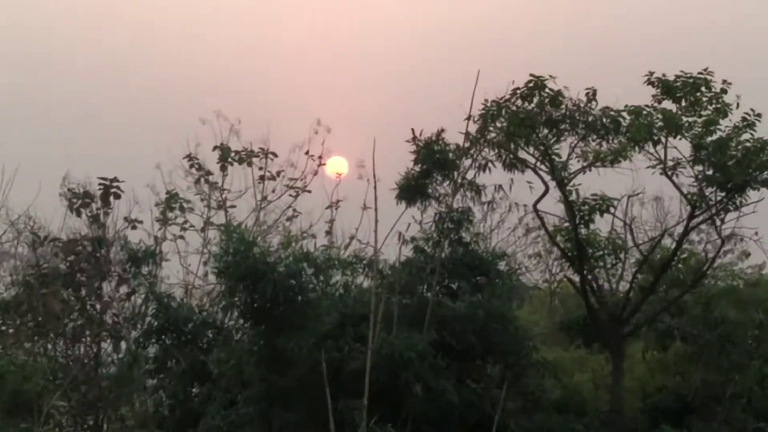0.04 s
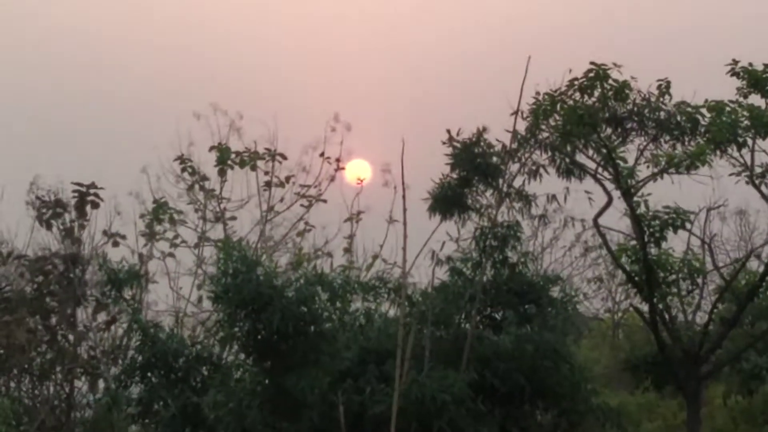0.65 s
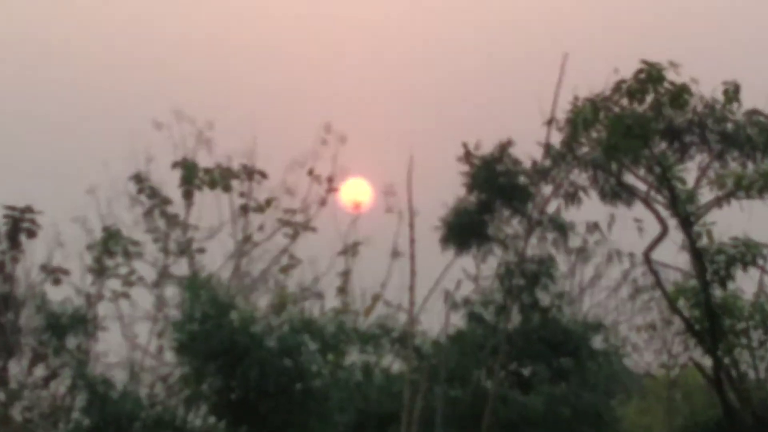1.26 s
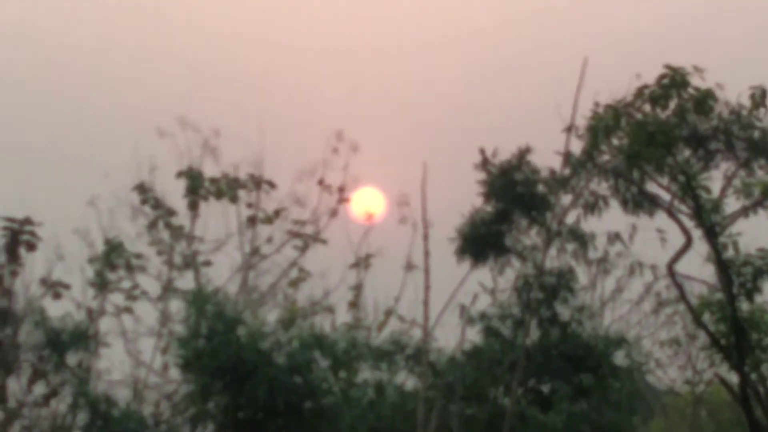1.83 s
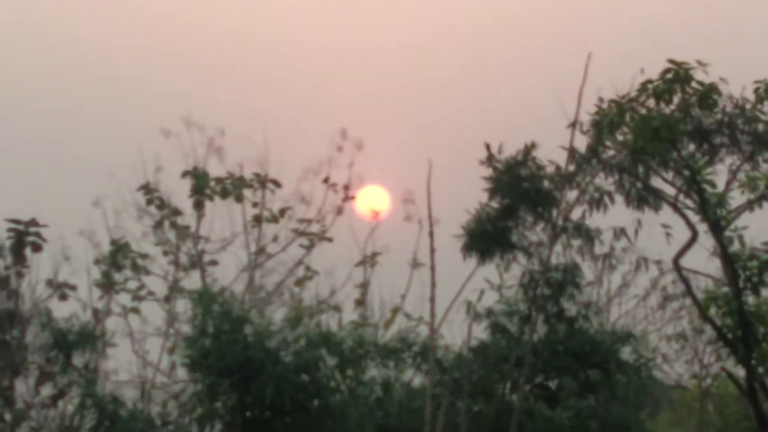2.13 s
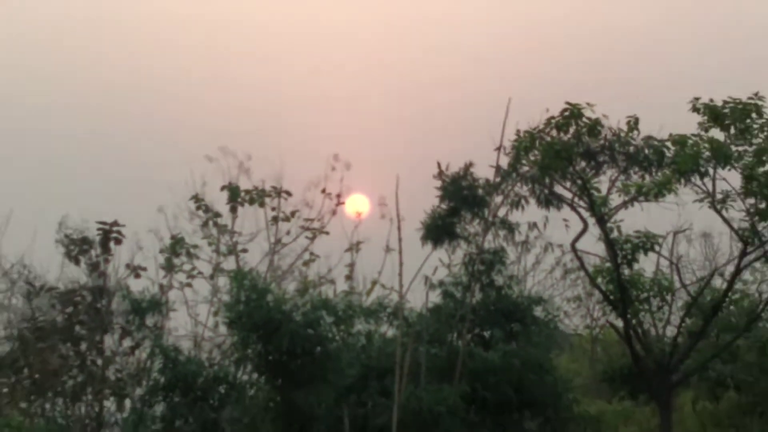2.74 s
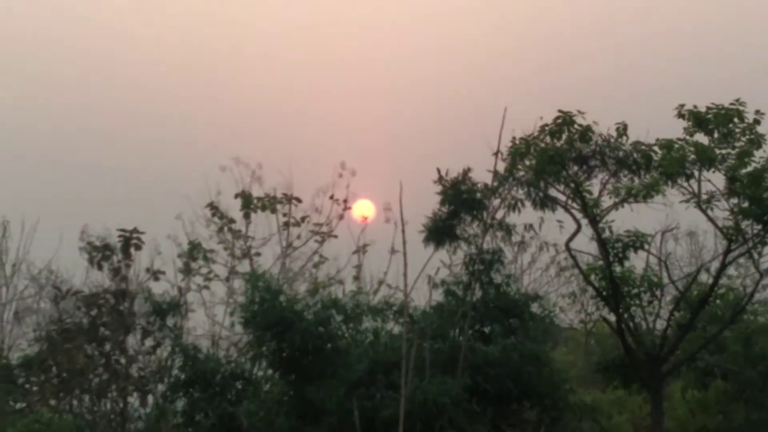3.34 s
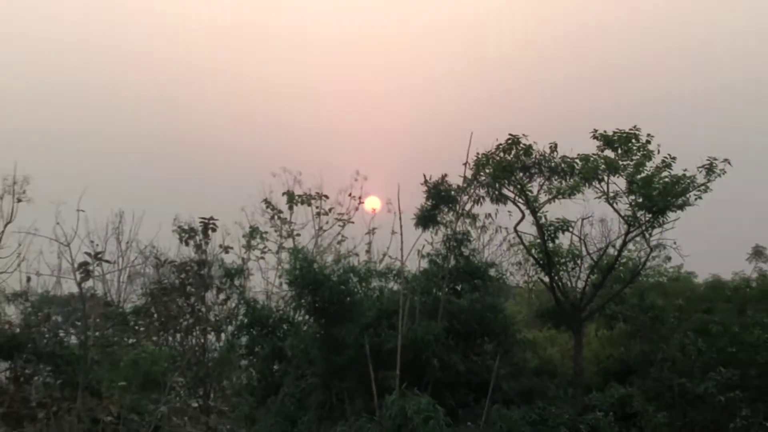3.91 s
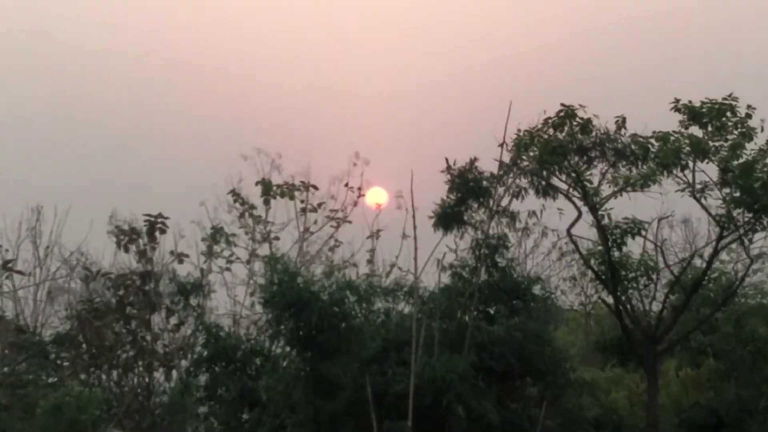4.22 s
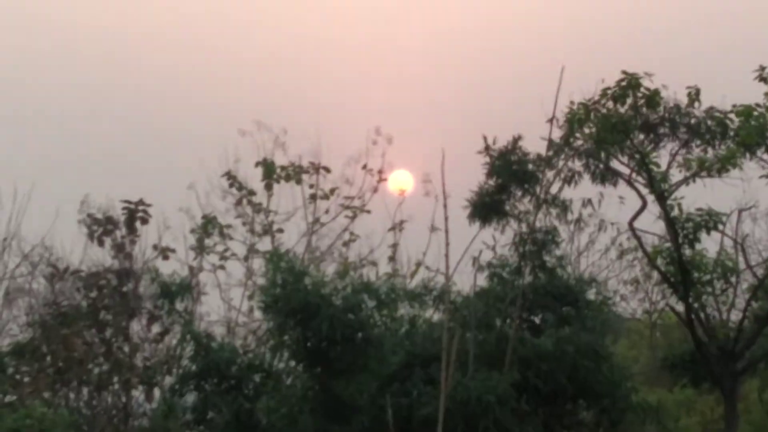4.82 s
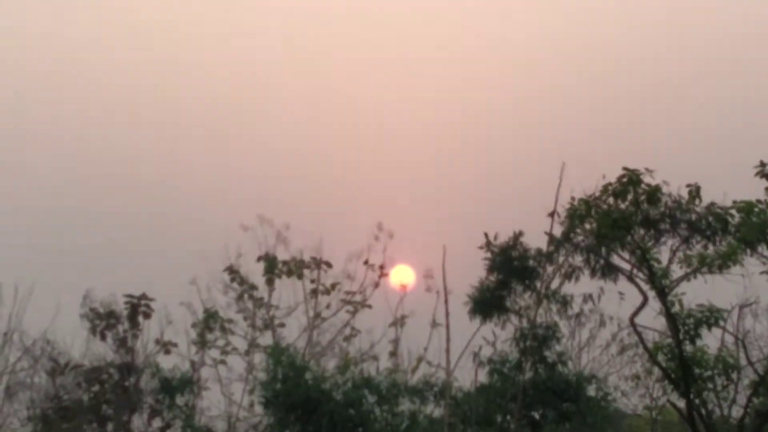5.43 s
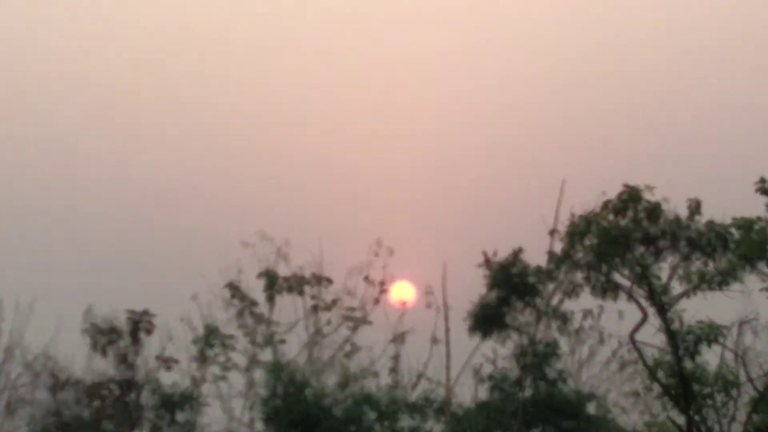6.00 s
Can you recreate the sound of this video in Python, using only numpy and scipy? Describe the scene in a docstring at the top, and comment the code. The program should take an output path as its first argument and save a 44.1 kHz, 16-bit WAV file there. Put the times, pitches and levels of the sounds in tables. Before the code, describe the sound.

Light gusts buffet a hand-held stereo microphone outdoors, making an uneven low rumble with occasional handling clicks and thumps on the left. Birds chirp and twitter briskly at first, give way to soft distant whistles, then return with chirrups and a clear gliding song on the right. Their calls echo slightly off the trees, and the bumps cluster near the end.

```python
"""Among trees at dawn, around a hand-held camera. Birds sing gliding syrinx tones: a hoarse call, a
chirrup, distant whistlers, a thin squealer, a rising lisp and, late, a near songster, over a far chorus.
The treeline returns an echo and a diffuse tail. Light wind buffets the two microphone ports separately;
small handling bumps pop on the left one."""
import sys
import numpy as np
from scipy import signal
from scipy.fft import rfft, irfft, next_fast_len
from scipy.io import wavfile
from scipy.ndimage import uniform_filter1d, map_coordinates

SR = 44100
rng = np.random.default_rng(int(sys.argv[2]) if len(sys.argv) > 2 else 0)


def put_to_file(sound):
    """Save the sound as 16-bit audio at rate SR, in the file named by the first command-line argument."""
    columns = np.atleast_2d(sound).T  # one column per channel
    safe = np.clip(columns, -1, 1)
    whole_steps = np.round(safe * 32767)
    wavfile.write(sys.argv[1], SR, whole_steps.astype(np.int16))


N = 267246


def amp(db):
    """Decibels to gain."""
    return 10 ** (np.asarray(db) / 20)


def unit(x):
    """Scale to rms 1."""
    return x / np.sqrt(np.mean(x ** 2) + 1e-20)


def along(points, hz):
    """Interpolate (Hz, value) points on a log axis."""
    f, v = np.transpose(points)
    return np.interp(np.log(hz + 1), np.log(f + 1), v)


def curve(points):
    """Interpolate (s, value) points at every sample."""
    return np.interp(np.arange(N) / SR, *np.transpose(points))


def wobble(rate_hz, size=N):
    """Smooth random curve, rate_hz knots a second."""
    knots = rng.standard_normal(int(size * rate_hz / SR) + 4)
    return map_coordinates(knots, [np.arange(size) * rate_hz / SR])


def filtered(x, response):
    """Apply a frequency response."""
    m = next_fast_len(N + SR // 2)
    return irfft(rfft(x, m) * response(np.fft.rfftfreq(m, 1 / SR)), m)[..., :N]


def noise(spectrum):
    """Noise of rms 1, coloured by (Hz, dB) points."""
    return unit(filtered(rng.standard_normal(N), lambda hz: amp(along(spectrum, hz))))


def add(track, s, sound):
    """Mix a sound into a track from time s."""
    start = max(0, round(s * SR))
    part = track[..., start:start + sound.shape[-1]]
    part += sound[..., :part.shape[-1]]


def panned(x, pan_db):
    """Equal-power pan; pan_db is left minus right."""
    return unit(amp([[pan_db / 2], [-pan_db / 2]])) * x


def lagged(pair, lag_s):
    """Sound from the side reaches the right port lag_s after the left."""
    return filtered(pair, lambda hz: np.exp(1j * np.pi * hz * lag_s * np.array([[1], [-1]])))


def note(rows, rough, overtone_db, shimmer_db=1.5, fade_s=0.0027):
    """Syrinx tone through (s, Hz, dB) points, with weak overtones; rough is fractional pitch jitter."""
    s, hz, db = np.transpose(rows)
    t = np.arange(s[0], max(s[-1], s[0] + .01), 1 / SR)
    pitch_hz = uniform_filter1d(np.interp(t, s, hz), size=300)
    pitch_hz *= 1 + rough * wobble(603.5, size=len(t))
    phase = 2 * np.pi * np.cumsum(pitch_hz) / SR
    overtones = sum(np.sin(k * phase) * (k * pitch_hz < SR / 2) for k in (2, 3))
    gate = np.clip(np.minimum(t - t[0], t[-1] - t) / fade_s, 0, 1)
    level_db = np.interp(t, s, db) + shimmer_db * wobble(56.0, size=len(t))
    return gate * amp(level_db) * (np.sin(phase) + amp(overtone_db) * overtones)


def bend(u, first, middle, last):
    """Parabola through three values at u = 0, 0.5, 1."""
    return np.polyval(np.polyfit([0, .5, 1], [first, middle, last], 2), u)


def arc(s, length_s, first_hz, middle_hz, last_hz, db):
    """(s, Hz, dB) points of a slurred note that bends, swells and eases."""
    # Each row: share of length, gain in dB.
    swell = [(0, -13.5), (.3, -1), (.55, 1), (1, -4)]
    u = np.linspace(0, 1, num=41)
    pitch_hz = bend(u, first_hz, middle_hz, last_hz)
    return np.transpose([s + length_s * u, pitch_hz, db + np.interp(u, *np.transpose(swell))])


def phrase(notes, rough, overtone_db, shimmer_db=1.5):
    """One bird's notes on one track."""
    out = np.zeros(N)
    for rows in notes:
        add(out, rows[0][0], note(rows, rough, overtone_db, shimmer_db))
    return out


def repeated(calls, shape, rough, overtone_db):
    """One call shape sung at several pitches and levels."""
    out = np.zeros((2, N))
    for s, top_hz, db, pan_db in calls:
        rows = [(t, share * top_hz, db + swell_db) for t, share, swell_db in shape]
        add(out, s, panned(note(rows, rough, overtone_db), pan_db))
    return out


def stretched(calls, shape, rough):
    """One call shape at several lengths and pitches, flickering on its way through the trees."""
    out = np.zeros((2, N))
    for s, length_s, top_hz, db, pan_db in calls:
        rows = [(u * length_s, share * top_hz, db + swell_db) for u, share, swell_db in shape]
        add(out, s, panned(note(rows, rough, overtone_db=-39, shimmer_db=3.5), pan_db))
    return out


def grove(x, echo_db, tail_db, delay_s=0.069, spread_s=0.011):
    """Return from the trees: a treeline echo, scatter just behind it, a diffuse tail."""
    # Each row: frequency in Hz, T60 in seconds.
    decay = [(1000, 0.36), (3500, 0.64), (6000, 0.52), (12000, 0.092)]
    hz, frame_s, spectra = signal.stft(rng.standard_normal((2, SR)), SR, nperseg=256)
    tail = signal.istft(spectra * amp(-60 * frame_s / along(decay, hz)[:, None]), SR, nperseg=256)[1]
    t = np.arange(tail.shape[1]) / SR
    scatter = rng.standard_normal(tail.shape) * (t > delay_s) * np.exp(-np.abs(t - delay_s) / spread_s)
    reflection = np.arange(len(t)) == round(delay_s * SR)
    echo = unit(unit(scatter) + unit(reflection))
    response = amp(tail_db) * unit(tail) + amp(echo_db) * echo
    return signal.fftconvolve(np.atleast_2d(x), response / np.sqrt(len(t)), axes=1)[:, :N]


def still_air():
    """Quiet outdoor floor, independent in each port."""
    # Each row: frequency in Hz, relative density in dB.
    colour = [(88, -44), (150, -11), (201, -13), (302, -10.5), (366, -13.5), (500, -13), (695, -19.5),
              (3690, -36), (8170, -35), (9000, -39), (12300, -42), (13800, -43), (15500, -60)]
    return amp(-61) * np.array([noise(colour), noise(colour)])


def far_voices(colour, patchy_db):
    """Many far birds, blurred into narrow flickering patches of pitch."""
    spectra = signal.stft([noise(colour), noise(colour)], nperseg=1024)[2]
    patches = uniform_filter1d(rng.standard_normal(spectra.shape[1:]), size=3, axis=0)
    patches = unit(uniform_filter1d(patches, size=9, axis=1))
    return unit(signal.istft(spectra * amp(patchy_db * patches), nperseg=1024)[1][:, :N])


def dawn_chorus():
    """Far high and low voices, swelling separately."""
    # Each row: frequency in Hz, relative density in dB.
    high_colour = [(1500, -11), (2000, -2), (2300, -0.5), (2700, -3.5), (3300, -0.5), (3900, -4),
                   (4600, -11), (5400, -13), (7000, -24)]
    low_colour = [(800, -27), (1100, -5), (1350, 1.5), (1700, 1.5), (1950, -12.5), (2400, -38.5)]
    # Each row: time in seconds, relative level in dB.
    high_levels = [(0, -59.5), (.3, -61.5), (1.2, -64.5), (1.8, -69), (3.4, -63.5), (4.2, -66),
                   (5.5, -62.5), (6.06, -65)]
    low_levels = [(0, -67), (1, -76), (2, -79), (3, -73), (4.3, -62), (5.1, -62), (6.06, -65.5)]
    high = amp(curve(high_levels) + .5) * panned(far_voices(high_colour, patchy_db=6.0), pan_db=-6)
    low = amp(curve(low_levels)) * panned(far_voices(low_colour, patchy_db=4.2), pan_db=-2)
    return high + low


def gusts(side, calm_db, calm_eddy_db, rise_db_per_s, fall_db_per_s, eddy_swing):
    """Rumble and eddy levels at one port: gusts rise, hold and fall, eddies more steeply."""
    # Each row: port, start of hold in seconds, hold in seconds, relative rumble in dB, eddy offset in dB.
    events = [("left", 0, 0.0084, -43, 3.6), ("left", 0.698, 0.056, -39, -1.2),
              ("left", 0.893, 0.22, -45, -3.5), ("left", 2.08, 0.051, -37, -5.5),
              ("left", 2.27, .13, -36, -13), ("left", 3.318, 0.079, -32.5, -10.5),
              ("left", 3.47, 0.58, -38, -30.5), ("left", 4.02, 0.24, -37, -6),
              ("left", 4.3, 0.077, -31, -8), ("right", 0.907, 0.071, -39.5, -24),
              ("right", 1.22, 0.0093, -30, -17.5), ("right", 1.347, .13, -30.5, -13.5),
              ("right", 1.526, 0.04, -30, -4.5), ("right", 1.66, .16, -39.5, -16),
              ("right", 1.846, .06, -28, -11), ("right", 2.087, .11, -29, -20),
              ("right", 2.92, 0.013, -42, -18), ("right", 3.32, .04, -39, -19),
              ("right", 3.58, .2, -32, -18), ("right", 3.84, .15, -29.5, -10),
              ("right", 4.18, .1, -32.5, -1), ("right", 4.37, 0.023, -29.5, -20),
              ("right", 4.57, 0.11, -42, -15), ("right", 4.87, 0.053, -31, -20),
              ("right", 5.02, 0.045, -33, -13.5), ("right", 5.32, .07, -35.5, -13.5),
              ("right", 5.5, 0.052, -31.5, -14), ("right", 5.86, 0.16, -31.5, -18.5)]
    t = np.arange(N) / SR
    rumble_db, eddy_db = np.full(N, float(calm_db)), np.full(N, float(calm_eddy_db))
    for where, s, hold_s, db, offset_db in events:
        if where == side:
            drop_db = rise_db_per_s * np.maximum(s - t, 0) + fall_db_per_s * np.maximum(t - s - hold_s, 0)
            rumble_db = np.maximum(rumble_db, db - drop_db)
            eddy_db = np.maximum(eddy_db, db + offset_db - eddy_swing * drop_db)
    return rumble_db, eddy_db


def port_wind(levels, eddy_colour, rumble_gain_db, lump_db, eddy_gain_db=2.5):
    """Wind at one port: low rumble and smaller eddies, both in lumps."""
    # Each row: frequency in Hz, relative density in dB.
    rumble_colour = [(15, -46.5), (25, -23), (40, -7), (62, 4), (90, -1.5), (150, -7.5), (250, -31),
                     (500, -50), (1500, -97.5)]
    rumble_db, eddy_db = levels
    lumps = wobble(35)
    rumble = unit(noise(rumble_colour) * amp(2.3 * lumps))
    eddies = unit(noise(eddy_colour) * amp(lump_db * (lumps + wobble(130))))
    return amp(rumble_db + rumble_gain_db) * rumble + amp(eddy_db + eddy_gain_db) * eddies


def wind():
    """Gusts catch each port separately: a rush on the left, a duller flutter on the right."""
    # Eddy spectra. Each row: frequency in Hz, relative density in dB.
    rush = [(50, -16), (130, -3), (250, 2.5), (400, -2.5), (700, -9), (1200, -14.5), (2000, -27),
            (4000, -30.5), (7000, -41), (14000, -66)]
    flutter = [(60, -22), (140, 9), (220, 5.5), (400, -9), (700, -24.5), (1200, -43), (3000, -78)]
    # Each port: relative calm rumble and eddies in dB, rise and fall in dB/s, eddy-to-rumble slope ratio.
    left_port = (-50, -68, 98, 72.5, 1.5)
    right_port = (-49.5, -66, 246, 164, 1.6)
    left = port_wind(gusts("left", *left_port), rush, rumble_gain_db=0.5, lump_db=2.0)
    right = port_wind(gusts("right", *right_port), flutter, rumble_gain_db=1.5, lump_db=2.5)
    return np.array([left, right])


def hoarse_call():
    """A burry call from the left, roughened by pitch jitter."""
    # Each row: time in seconds, pitch in Hz, relative level in dB.
    contour = [(0, 3157, -48), (.025, 3650, -55), (.04, 3353, -49), (.07, 3595, -48), (.085, 3285, -46),
               (.125, 3085, -55)]
    voice = phrase([contour], rough=0.021, overtone_db=-32.5)
    return panned(voice, pan_db=12) + panned(grove(voice, echo_db=-5.5, tail_db=-1), pan_db=5)


def chirrup():
    """A repeated call: flick up, held tone, drop."""
    # Each row: start in seconds, held pitch in Hz, relative level in dB, pan in dB.
    calls = [(0.121, 2740, -36, 6), (0.388, 2807, -39, 0.5), (0.711, 2835, -41, -2.5),
             (4.113, 2764, -45.5, -25), (4.355, 2790, -47, -19), (4.852, 2830, -46.5, -12),
             (5.188, 2870, -47.5, -13)]
    # Each row: offset in seconds, share of held pitch, gain in dB.
    shape = [(0, .71, -10), (.015, 0.84, 4.5), (.027, 0.89, -11), (.042, 1, -8), (.072, 1, -11.5),
             (.088, .88, -8.5), (.103, 0.68, -13)]
    voice = lagged(repeated(calls, shape, rough=.008, overtone_db=-33), lag_s=.00053)
    return amp(-3.5) * (voice + grove(voice, echo_db=-21, tail_db=-10.5))


def whistlers(ripple_hz=27, ripple_db=3.0, fade_db=11, midway_share=.75):
    """Distant arched hoots, scooped chirps and slurs; paths through the trees ripple the slurs."""
    # Each row: start in seconds, length in seconds, top pitch in Hz, relative level in dB, pan in dB.
    arches = [(2.1, .14, 1610, -60.5, -5), (2.675, 0.097, 1570, -56, -3), (3.002, .1, 1683, -56, -2.5),
              (3.685, .085, 1263, -65, 6), (3.92, .12, 1423, -57.5, 4), (4.16, .16, 1530, -51, 0),
              (4.42, .17, 1593, -53.5, -5), (4.7, 0.19, 1643, -54.5, -2), (5.95, 0.066, 2460, -57.5, -17)]
    scoops = [(1.397, .073, 5270, -62, 4), (1.498, .07, 5240, -64, 3)]
    # Each row: share of length, share of top pitch, gain in dB.
    arch_shape = [(0, .91, -8), (.2, .91, -3.5), (0.449, .99, -0.5), (.55, 1, 1.5), (.7, .97, -0.5),
                  (1, .82, -5)]
    scoop_shape = [(0, .9, -5), (.25, .81, -2), (.5, .8, -1), (.75, .87, 1), (1, 1, -5)]
    # Each row: start in seconds, length in seconds, first and last pitch in Hz, relative level in dB.
    slurs = [(.15, .34, 797, 790, -67), (0.851, 0.072, 3650, 3490, -65.5),
             (2.202, 0.082, 2144, 1870, -64.5), (2.363, 0.16, 2105, 2033, -66),
             (2.705, 0.12, 1990, 1883, -61), (2.838, .209, 1775, 1723, -57.5),
             (3.1, .24, 2208, 2163, -53.5), (3.281, .08, 2150, 1550, -56), (3.459, .08, 1700, 1750, -63.5),
             (3.883, .04, 2200, 2287, -55.5), (3.929, 0.04, 2335, 2286, -53)]
    out = stretched(arches, arch_shape, rough=.007) + stretched(scoops, scoop_shape, rough=0.013)
    u = np.linspace(0, 1, num=41)
    for s, length_s, first_hz, last_hz, db in slurs:
        pitch_hz = first_hz + (last_hz - first_hz) * bend(u, 0, midway_share, 1)
        level_db = db + 0.5 - fade_db * np.abs(2 * u - 1) ** 3
        level_db += ripple_db * np.sin(2 * np.pi * ripple_hz * length_s * u)
        whistle = note(np.transpose([length_s * u, pitch_hz, level_db]), rough=0.0044, overtone_db=-40)
        add(out, s, panned(whistle, pan_db=-11))
    return out + grove(out, echo_db=-17.5, tail_db=-8.5)


def squealer():
    """A thin squeal climbs, warbles and runs into a scratchy twitter, blurred by leaves."""
    # Each row: time in seconds, pitch in Hz, relative level in dB.
    contour = [(0.228, 5800, -65), (0.28, 6180, -54.5), (0.304, 6593, -48), (0.314, 4920, -48.5),
               (0.324, 6060, -54), (0.348, 6570, -51.5), (0.366, 4855, -48)]
    # Each row: start and length in seconds, first, middle and last pitch in Hz, relative level in dB.
    notes = [(.41, 0.059, 5600, 5250, 3200, -46.5), (0.47, 0.039, 4000, 5304, 4110, -42),
             (.53, .036, 5100, 5320, 5100, -50), (0.578, .035, 6500, 5120, 4000, -46),
             (.628, .038, 6300, 5150, 4260, -52.5)]
    squeal = phrase([contour], rough=.009, overtone_db=-18)
    twitter = phrase([arc(*row) for row in notes], rough=.016, overtone_db=-28)
    voice = amp(1.5) * squeal + twitter
    trees = grove(voice, echo_db=-7.5, tail_db=-4.5, delay_s=.047)
    return amp(-3.5) * (panned(voice, pan_db=-23) + trees)


def handling_bumps(thump_hz=55.2, thump_life_s=0.013, rub_rise_s=0.01, rub_fall_s=0.0031):
    """Pressure steps from the hand: a click, then the microphone swings back and rings low."""
    # Each row: start in seconds, relative click in dB, click life in seconds, relative thump in dB.
    pops = [(0.4862, -19, .0014, -15), (.5893, -12.5, 0.0024, -16.5), (1.4241, -23.5, .0015, -28.5),
            (1.8585, -12, 0.0026, -18), (2.7932, -15, 0.00034, -23), (2.815, -18.5, 0.0033, -24),
            (3.1203, -18, 0.0024, -17), (3.149, -14, 0.0027, -7.5), (5.1795, -12, .0009, -17),
            (5.3407, -12, 0.00039, -19), (5.5038, -12, 0.00044, -19), (5.6277, -18, .0005, -25.5)]
    # Hand slips, a rub ending in a click. Each row: click time in seconds, relative level in dB.
    scuffs = [(2.7933, -19.5), (4.3241, -22.5), (5.238, -17), (5.398, -12.5), (5.5826, -10.5),
              (5.6827, -13)]
    scuff_life_s, scuff_thump_db, rub_db = 0.00078, -15.5, -20
    out, t = np.zeros(N), np.arange(SR // 6) / SR
    scuff_pops = [(s, db, scuff_life_s, db + scuff_thump_db) for s, db in scuffs]
    for s, click_db, click_life_s, thump_db in pops + scuff_pops:
        click = amp(click_db + 3) * np.exp(-t / click_life_s)
        thump = amp(thump_db + 6.5) * np.sin(2 * np.pi * thump_hz * t) * np.exp(-t / thump_life_s)
        add(out, s, click - thump)
    rub_band = signal.butter(1, [250, 1300], "bandpass", fs=SR)
    rub_envelope = np.r_[np.exp(-t[::-1] / rub_rise_s), np.exp(-t / rub_fall_s)]
    for s, db in scuffs:
        grit = unit(signal.lfilter(*rub_band, rng.standard_normal(2 * len(t))))
        add(out, s - len(t) / SR, amp(db + rub_db) * grit * rub_envelope)
    # The heaviest bump rocks the whole body for a few cycles.
    cycles = 58 * t + 0.22 * (1 - np.exp(-t / 0.0021))
    add(out, 3.1575, amp(-5.0) * np.sin(2 * np.pi * cycles) * np.exp(-(t / 0.025) ** 2))
    return signal.lfilter(*signal.butter(2, 2000, "lowpass", fs=SR), out)


def lisp():
    """A high rising call, repeated on the right."""
    # Each row: start in seconds, top pitch in Hz, relative level in dB, pan in dB.
    calls = [(0.745, 5130, -54.5, -10), (1.82, 5310, -50.5, -9), (3.108, 5240, -53.5, -15),
             (4.072, 5186, -55.5, -25), (5.232, 5240, -56, -16)]
    # Each row: offset in seconds, share of top pitch, gain in dB.
    shape = [(0, .68, -9.5), (.017, .78, -9), (.05, .92, -1.5), (0.069, 0.97, -0.5), (.08, 1, 3.5),
             (.095, 0.97, -3)]
    voice = repeated(calls, shape, rough=.005, overtone_db=-32)
    return voice + grove(voice, echo_db=-26.5, tail_db=-15)


def eddy_slaps(side, width_cycles=0.28):
    """A single eddy passing a port pushes once and pulls once."""
    # Each row: port, centre in seconds, relative level in dB, nominal frequency in Hz.
    slaps = [("right", 1.378, -22.5, 170), ("right", 1.465, -24, 184), ("right", 1.537, -16, 195),
             ("right", 1.547, -16.5, 170), ("right", 1.572, -18, 250), ("right", 1.889, -17, 95),
             ("right", 1.988, -11, 108), ("left", 3.893, -14, 60), ("right", 4.248, -20, 120),
             ("right", 5.532, -22.5, 95)]
    out, t = np.zeros(N), np.arange(N) / SR
    for where, s, db, hz in slaps:
        if where == side:
            u = (t - s) * hz / width_cycles
            out -= amp(db + 8) * u / (1 + u * u) ** 2
    return out


def songster():
    """Clear slurred whistles from a near tree on the right."""
    # Each row: start and length in seconds, first, middle and last pitch in Hz, relative level in dB.
    notes = [(4.6, 0.082, 4190, 3890, 3100, -47.5), (4.847, 0.07, 3840, 3420, 3190, -43),
             (4.903, 0.092, 3290, 2860, 2540, -51), (5.103, .078, 4070, 3810, 3120, -44),
             (5.101, .014, 4900, 4770, 4600, -56), (5.165, 0.017, 3950, 4000, 3870, -51),
             (5.461, 0.0175, 3600, 3920, 4060, -50.5), (5.225, .058, 2900, 3036, 3170, -42.5),
             (5.335, .138, 3900, 3480, 3750, -43.5), (5.553, .095, 2800, 3143, 3765, -45),
             (5.663, 0.083, 3580, 3840, 3910, -51.5), (5.716, .06, 6560, 3890, 2990, -45),
             (5.77, 0.027, 5200, 4480, 3850, -51.5)]
    voice = phrase([arc(*row) for row in notes], rough=.0055, overtone_db=-31, shimmer_db=2.2)
    trees = grove(voice, echo_db=-7, tail_db=-9, delay_s=.055, spread_s=0.015)
    return panned(voice, pan_db=-30) + panned(trees, pan_db=-10.5)


def port_resonance(x, lift_db=8, centre_hz=12200, half_width_hz=1300):
    """The port cavities ring high up, adding sheen to the birds' overtones."""
    return filtered(x, lambda hz: amp(lift_db / (1 + ((hz - centre_hz) / half_width_hz) ** 2)))


def scene():
    """Birds and background in both ports; wind per port; bumps on the left only."""
    buffeting = wind() + np.array([handling_bumps() + eddy_slaps("left"), eddy_slaps("right")])
    birds = songster() + squealer() + hoarse_call() + lisp() + chirrup() + whistlers()
    return buffeting + port_resonance(birds) + still_air() + dawn_chorus()


def record(dry, low_cut_hz=32, band_limit_hz=15700):
    """The camera drops the deepest bass and everything above its band limit."""
    thinned = signal.sosfilt(signal.butter(3, low_cut_hz, "highpass", fs=SR, output="sos"), dry)
    return filtered(thinned, lambda hz: hz < band_limit_hz)


dry = scene()
out = record(dry)
put_to_file(out)
```